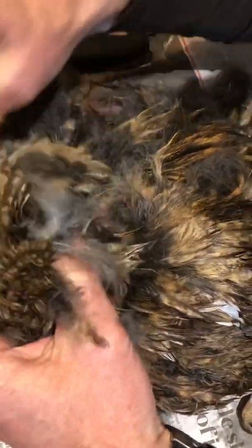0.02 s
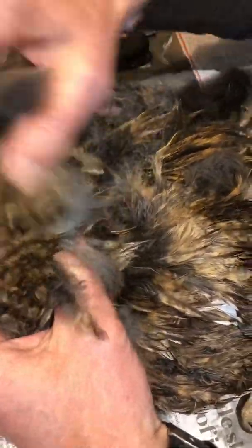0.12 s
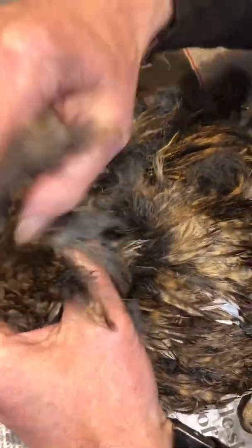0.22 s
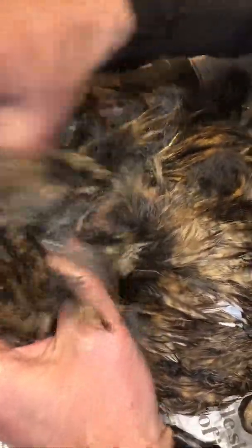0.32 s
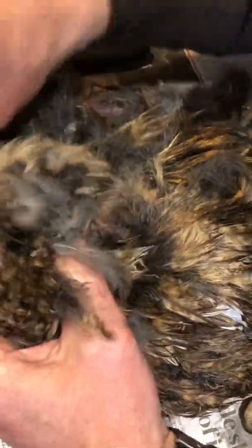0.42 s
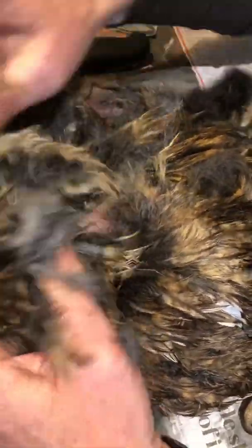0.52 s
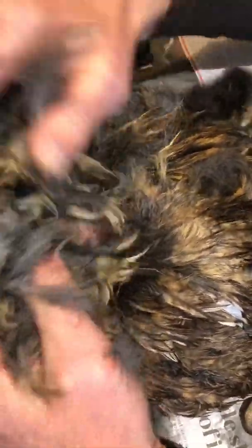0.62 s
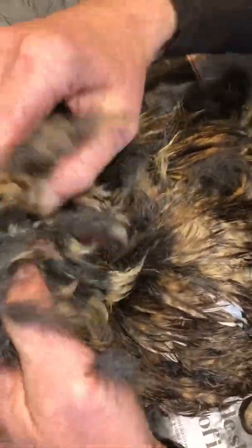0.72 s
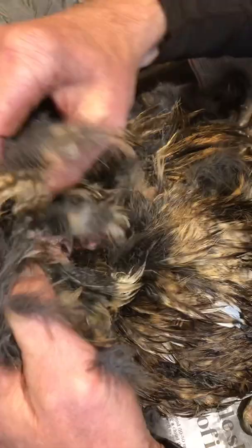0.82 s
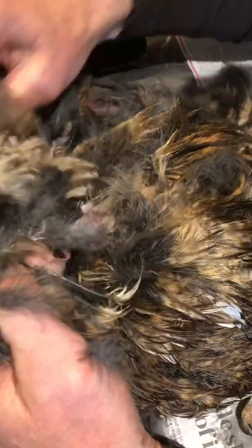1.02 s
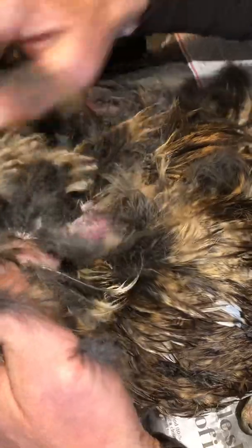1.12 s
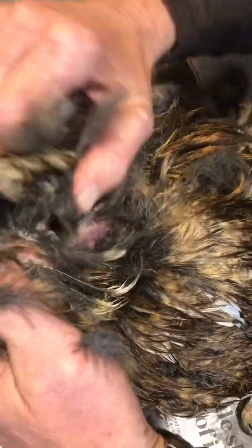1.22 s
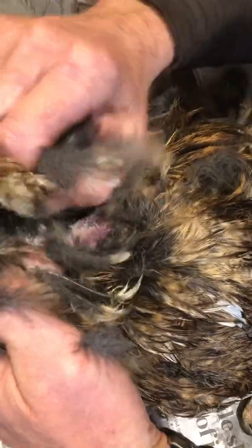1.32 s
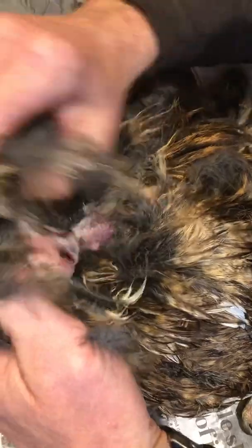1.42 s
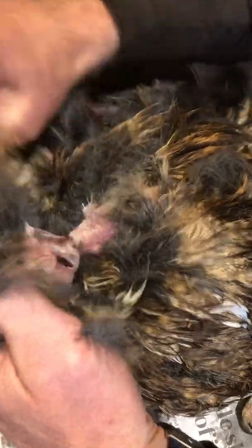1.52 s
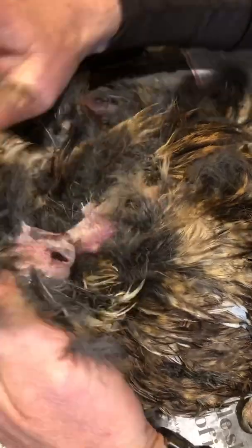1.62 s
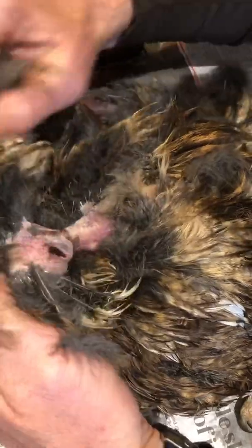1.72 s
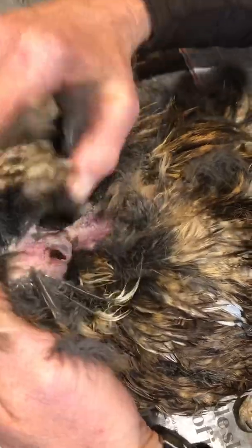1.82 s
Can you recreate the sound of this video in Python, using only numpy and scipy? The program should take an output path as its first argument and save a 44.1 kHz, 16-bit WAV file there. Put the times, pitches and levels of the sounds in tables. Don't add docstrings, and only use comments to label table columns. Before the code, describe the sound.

Close to a phone indoors, a tuft of feathers tears out in a dense dry crackle, then sparse quill snaps, dull palm brushing and soft table bumps follow over faint room hiss and slight echo.

```python
import sys
import numpy as np
from scipy import signal
from scipy.fft import rfft, irfft, next_fast_len
from scipy.io import wavfile
from scipy.ndimage import uniform_filter1d

SR = 44100
rng = np.random.default_rng(int(sys.argv[2]) if len(sys.argv) > 2 else 0)


def store_wav(level_fs):
    pcm = np.round(np.clip(np.atleast_2d(level_fs), -1, 1) * 32767)
    wavfile.write(sys.argv[1], SR, pcm.T.astype(np.int16))


def linear_from_db(decibels):
    return 10 ** (np.asarray(decibels, float) / 20)


N = 81585

# f/Hz, level/dB per Hz
AIR_COLOUR = [(18, -9), (40, 2.5), (75, -5), (170, -3.5), (560, -15.5), (2050, -18), (2900, -25),
              (6000, -26.5), (16000, -41.5)]
# t/s, level/dB
DOWN_LEVEL = [(0.0, -64.5), (0.262, -66), (0.406, -72), (0.54, -79), (0.762, -90), (0.936, -74),
              (1.23, -70.5), (1.494, -72.5), (1.85, -79.5)]
# f/Hz, level/dB per Hz
DOWN_COLOUR = [(1470, -63), (2500, -14), (5610, -10.5), (6150, -16), (6920, -0.5), (8940, -9), (15200, -15),
               (16000, -1)]
# t/s, rise/s, hold/s, fall/s, level/dB
TEARS = [(0.22, .002, 0.029, 0.02, -45), (0.298, 0.024, .13, 0.015, -64), (.635, 0.0061, 0.0046, .008, -71),
         (0.766, 0.017, 0.071, 0.015, -64), (0.789, 0.0042, .006, 0.0033, -56.5),
         (0.8, 0.0012, 0.0046, 0.0083, -54), (.89, 0.013, 0.041, 0.12, -66.5),
         (1.368, 0.0035, 0.052, 0.011, -56.5), (1.475, .015, 0.033, 0.0075, -66),
         (1.58, 0.0085, 0.019, 0.012, -71), (1.679, .008, 0.024, 0.053, -70.5),
         (0.126, .01, 0.0088, 0.0074, -70.5)]
# f/Hz, level/dB per Hz
BARB_COLOUR = [(290, -51), (500, 2.5), (1020, -28.5), (1970, 0.5), (2960, -11), (5390, -2), (9940, -11.5),
               (12900, -17), (16300, -22)]
# t/s, peak level/dB, skin pop level/dB, bright crack level/dB
RIP_QUILLS = [(.2097, -23, -5, -16), (.2149, -32, -14, -8), (.2198, -16, -5, -16), (.2218, -21.5, -6, -14),
              (.2234, -20, -11, -14), (.2285, -20, -10, -12), (.231, -23, -9, -12), (.2329, -24, -5, -12),
              (.2344, -22, -6, -12), (.2377, -24, -3, -10), (.2395, -30, 3, -12), (.2458, -24.5, 2, -4),
              (.248, -20.5, -1, 0), (.2497, -25, -3, -3), (.2598, -30, -6, 0)]
# t/s, peak level/dB, skin pop level/dB, bright crack level/dB, pitch factor/1
SINGLE_QUILLS = [(.638, -52, -5, -16, .95), (.7821, -37.5, 10, -16, 1.08), (1.3094, -52, -10, -12, 1.08),
                 (1.3588, -40.5, 0, -10, .95), (1.3706, -30.5, 5, -12, 1.05), (1.381, -40, 14, -10, .8),
                 (1.3872, -33, 6, -6, .82), (1.4114, -26.5, 3, -12, .8), (1.4255, -41, 9, -8, .9),
                 (1.4762, -46, -8, -14, 1.1), (1.6166, -44, -25, -3, 1.2), (1.6229, -45.5, -25, -10, 1.15),
                 (1.6761, -44.5, 7, -20, .76), (1.686, -51, 14, -10, .72), (1.7928, -49, 1, -16, .85),
                 (.39, -53, 9, -14, .9)]
# low f/Hz, high f/Hz, time to fall 60 dB/s
FLESH = (450, 1200, .01)
SKIN = (1450, 2350, .005)
SHAFT = (3650, 5800, .0065)
CRACK = (7200, 10500, .005)
TIP = (11500, 15000, .007)
# f/Hz, time to fall 60 dB/s
WALL_DECAY = [(300, .3), (3000, 0.33), (12000, 0.19)]
# t/s, rise/s, fall/s, level/dB
STROKES = [
    (.25, .03, 0.051, -51),
    (0.932, 0.077, 0.12, -57.5),
    (1.411, 0.026, 0.048, -57.5),
    (1.689, 0.026, 0.1, -61.5),
    (1.8, 0.012, 0.045, -66.5),
]
# f/Hz, level/dB per Hz
PALM_COLOUR = [(88, -13), (150, -8), (347, -2.5), (502, -11.5), (859, -7), (1150, -15), (4000, -25.5),
               (5200, -19), (8800, -120)]
# t/s, level/dB, f/Hz, time to fall 60 dB/s
THUMPS = [
    (.275, -39, 47.8, 0.14),
    (0.349, -50, 37.6, 0.99),
    (.832, -43, 36, 0.22),
    (0.901, -54, 42, 0.69),
    (1.43, -43.5, 41.3, 0.21),
    (1.5, -77, 42, 0.33),
]
# t/s, level/dB, f/Hz, time to fall 60 dB/s
BUMPS = [
    (0.439, -54.5, 144.5, .1),
    (1.417, -53.5, 117, 0.33),
    (1.587, -49.5, 133, 0.086),
    (1.614, -45.5, 131.4, 0.14),
    (1.663, -48, 169, 0.12),
    (1.686, -48, 300, 0.057),
    (1.721, -46.5, 127, 0.096),
    (1.795, -41.5, 283, 0.035),
]


def unit(x):
    return x / np.sqrt(np.mean(x ** 2) + 1e-20)


def along(points, hz):
    f, value = np.transpose(points)
    return np.interp(np.log(hz + 1), np.log(f + 1), value)


def coloured(x, colour):
    size = next_fast_len(N + 8192)
    gain = linear_from_db(along(colour, np.fft.rfftfreq(size, 1 / SR)))
    return unit(irfft(rfft(x, size) * gain, size)[:N])


def patchy(depth_db):
    z = signal.stft(rng.standard_normal(N + 512), nperseg=512)[2]
    patches = uniform_filter1d(rng.standard_normal(z.shape), size=6, axis=0)
    patches = uniform_filter1d(patches, size=8, axis=1)
    return signal.istft(z * linear_from_db(depth_db * unit(patches)), nperseg=512)[1][:N]


def swell(s, rise, hold, fall, db):
    t = np.arange(N) / SR
    before = np.maximum(s - t, 0)
    after = np.maximum(t - s - hold, 0)
    return linear_from_db(db) * np.exp(-(before / rise) ** 2 - after / fall)


def room_air():
    return linear_from_db(-63) * coloured(patchy(2.5), AIR_COLOUR)


def down():
    s, db = np.transpose(DOWN_LEVEL)
    loudness = linear_from_db(np.interp(np.arange(N) / SR, s, db))
    return loudness * coloured(patchy(2.0), DOWN_COLOUR)


def barbs():
    ticks_per_s, spread_db = 3000, 5
    happens = rng.random(N) < ticks_per_s / SR
    strength = linear_from_db(spread_db * rng.standard_normal(N))
    ticks = happens * strength * rng.choice([-1, 1], N)
    hiss = unit(patchy(3.3))
    rustle = coloured(unit(ticks) + hiss, BARB_COLOUR)
    return sum(swell(*tear) for tear in TEARS) * rustle


def quills():
    flesh_db, tip_db = -9, -6
    click, lead_s = 4, .0001
    out, t = np.zeros(N + SR), np.arange(SR // 20) / SR
    rows = [row + (1,) for row in RIP_QUILLS] + SINGLE_QUILLS
    noises = rng.standard_normal((len(rows), 5, len(t)))
    for (s, db, pop_db, crack_db, pitch), noise in zip(rows, noises):
        snap = 0
        levels = [pop_db + flesh_db, pop_db, 0, crack_db, crack_db + tip_db]
        parts = [FLESH, SKIN, SHAFT, CRACK, TIP]
        for part_db, (lo_hz, hi_hz, t60), x in zip(levels, parts, noise):
            edges = [lo_hz * pitch, hi_hz * pitch]
            band = signal.butter(3, edges, "bandpass", fs=SR, output="sos")
            push = x * linear_from_db(-60 * t / t60) - click * (t == 0)
            ring = signal.sosfilt(band, push)
            snap = snap + linear_from_db(part_db) * ring / np.abs(ring).max()
        start = round((s - lead_s) * SR)
        out[start:][:len(t)] += linear_from_db(db) * snap / np.abs(snap).max()
    return out[:N]


def walls(x):
    hz, t, z = signal.stft(rng.standard_normal(SR // 2), SR, nperseg=256)
    fade = linear_from_db(-60 * t / along(WALL_DECAY, hz)[:, None])
    tail = signal.istft(z * fade, SR, nperseg=256)[1]
    late = np.pad(x, (130, 0))
    return linear_from_db(-11.5) * signal.fftconvolve(late, tail / np.linalg.norm(tail))[:N]


def palm():
    strokes = sum(swell(s, rise, 0, fall, db) for s, rise, fall, db in STROKES)
    return strokes * coloured(patchy(2.35), PALM_COLOUR)


def struck(s, db, hz, t60, rise):
    t = np.maximum(np.arange(N) / SR - s, 0)
    return linear_from_db(db - 60 * t / t60) * np.sin(2 * np.pi * hz * t) * (1 - np.exp(-t / rise))


def table():
    thumps = sum(struck(*row, rise=0.013) for row in THUMPS)
    bumps = sum(struck(*row, rise=0.008) for row in BUMPS)
    return thumps + bumps


def scene():
    snaps = quills()
    return (room_air() + down() + barbs() + snaps + walls(snaps) + palm() + table())[None]


def top_cut(x):
    return signal.sosfilt(signal.butter(12, 16470, fs=SR, output="sos"), x)


def record(dry):
    treble_cut = signal.butter(30, 15750, fs=SR, output="sos")
    kept = signal.sosfiltfilt(treble_cut, dry)
    return top_cut(kept)


dry = scene()
out = record(dry)
store_wav(out)
```